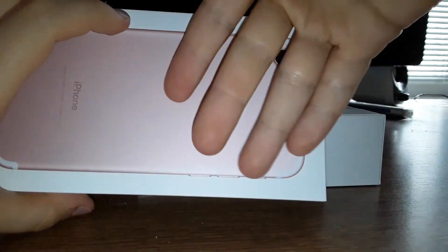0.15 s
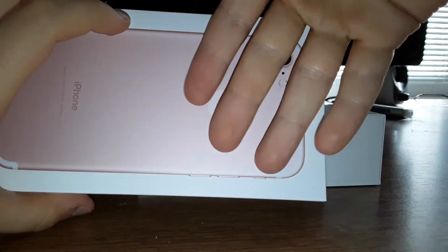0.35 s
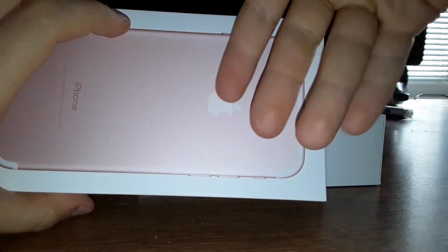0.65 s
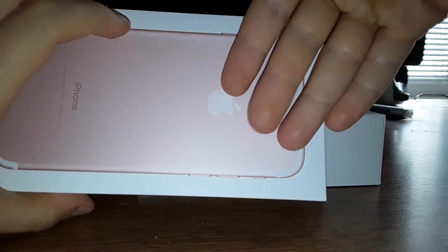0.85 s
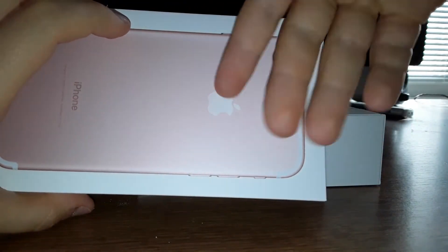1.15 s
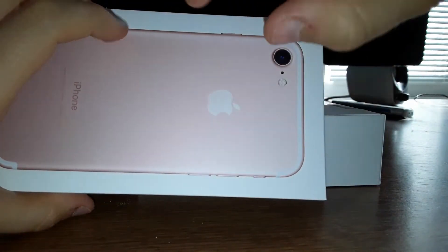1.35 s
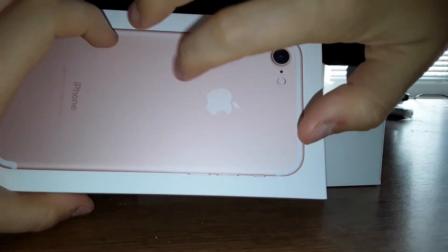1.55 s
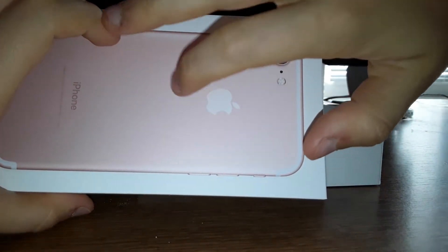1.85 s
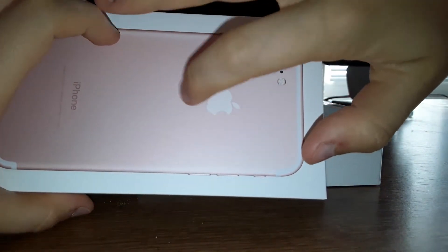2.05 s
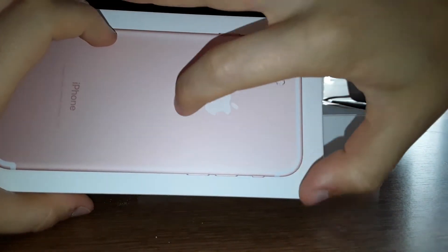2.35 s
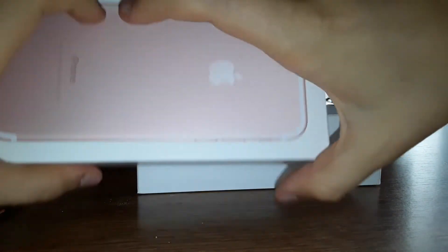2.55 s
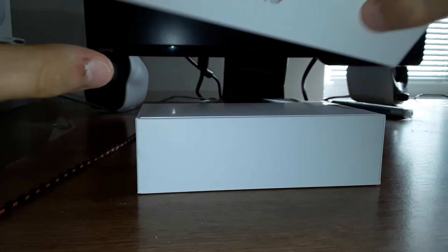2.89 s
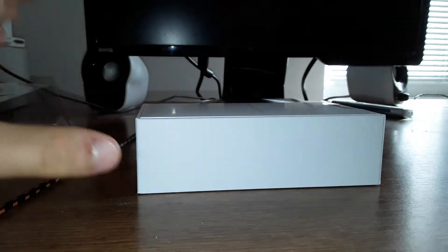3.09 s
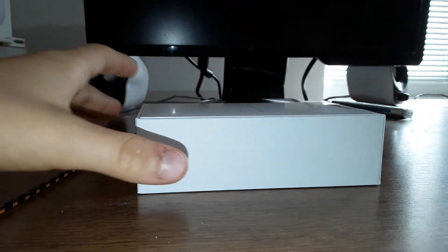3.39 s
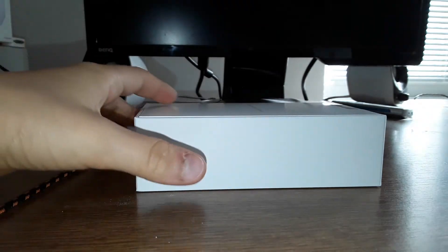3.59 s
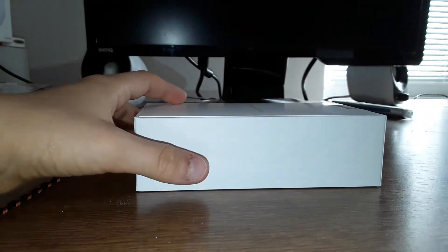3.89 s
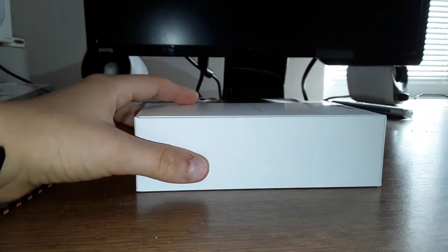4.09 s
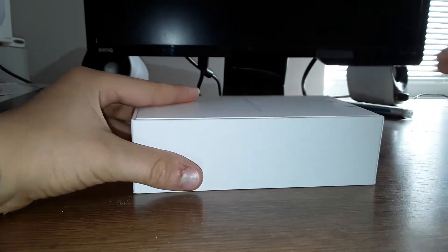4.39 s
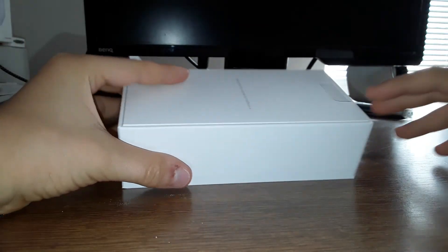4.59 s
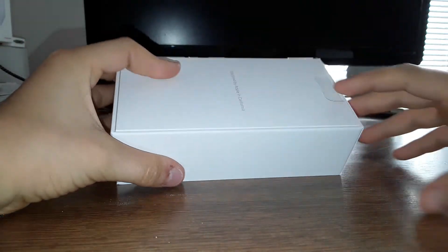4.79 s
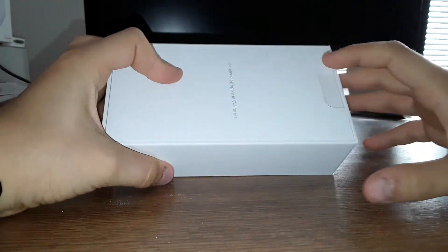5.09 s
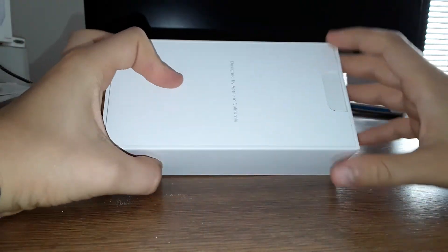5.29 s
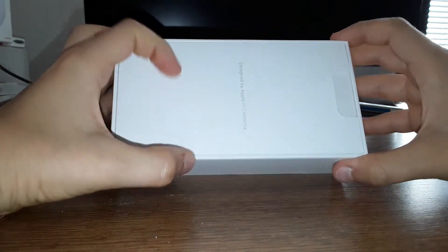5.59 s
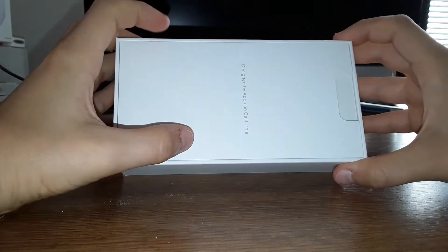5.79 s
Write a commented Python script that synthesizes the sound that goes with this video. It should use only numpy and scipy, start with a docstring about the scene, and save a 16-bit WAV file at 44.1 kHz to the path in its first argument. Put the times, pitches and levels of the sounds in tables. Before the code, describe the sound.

Close to a small microphone in a quiet, faintly humming room, fingertips drum irregularly on a hollow cardboard lid, then tap in a steady run. The lid is moved away with a soft bright rustle. A heavier box is gripped, knocked loudly on a wooden desk, then scraped and turned, with one sharp thump and two tiny squeaks.

```python
"""Fingers drum on the hollow lid of a small cardboard box: each blow excites damped modes of the card.
Then the lid is put aside, and the heavy base is gripped, tipped, knocked and slid on a wooden desk.
Knocks are modal too; rubbing is random grains of friction, squeaks are nearly periodic stick-slip,
snaps are short noise bursts. Behind them lie filtered air noise, hum, a rumble and a fading motor."""
import sys
import numpy as np
from scipy import signal
from scipy.io import wavfile
from scipy.ndimage import uniform_filter1d

SR = 44100
rng = np.random.default_rng(int(sys.argv[2]) if len(sys.argv) > 2 else 0)


def store_pcm(level_fs):
    """Save levels as 16-bit WAV."""
    pcm = np.round(np.clip(level_fs, -1, 1) * 32767).astype(np.int16)
    wavfile.write(sys.argv[1], SR, np.atleast_2d(pcm).T)


N = 261954  # length [samples]

# steady air of the room: (frequency [Hz], relative level [dB per Hz])
AIR_SPECTRUM = [(20, -5.5), (40, -21), (107, -3.5), (200, -4.5), (250, -12.5), (300, -17.5), (500, -14),
                (855, -28), (2040, -33.5), (4600, -44), (6250, -50), (8100, -27.5), (10000, -34),
                (11300, -38), (12200, -38.5), (13200, -37.5), (14500, -49), (16200, -61.5)]
# wavering room tones: (frequency [Hz], width [Hz], rms level [dB])
HUM_LINES = [(59, 4, -76), (123, 9.5, -59), (239.6, 1.7, -53.5), (544, 3.7, -69.5)]
# distant motor, droning and fading:
# (time [s], pitch [Hz], rms level of the fundamental [dB], rms level of the third multiple [dB])
MOTOR_COURSE = [(0, 68.6, -50, -55), (.3, 67.3, -49, -57.5), (.6, 66.25, -51, -43), (.75, 65.3, -46, -46.5),
                (.85, 65, -49, -53), (.95, 60.5, -57, -55), (1.8, 60.7, -83, -81)]
# decay of the room: (frequency [Hz], 60 dB decay time [s])
ROOM_DECAY = [(100, 0.1), (300, 0.28), (600, 0.34), (1500, 0.32), (4000, 0.18), (9000, 0.21)]

# bright hiss of skin on card, through a peaky microphone: (frequency [Hz], relative level [dB])
SKIN_SPECTRUM = [(3500, -23), (5000, -15.5), (6600, -6.5), (7800, 7), (8400, 6.5), (9600, -6), (11000, -21),
                 (12300, -15.5), (14000, -34.5), (16000, -61)]
# dull swish of hands on card: (frequency [Hz], relative level [dB])
SWISH_SPECTRUM = [(900, -32), (1600, -3), (2200, 1), (2700, -3.5), (3800, -5), (4600, -9.5), (6000, -4.5),
                  (8000, -10), (12000, -61.5)]
# scrape of the box on wood: (frequency [Hz], relative level [dB])
SCRAPE_SPECTRUM = [(500, -12), (700, 0), (880, -0.5), (980, 3.5), (1150, -2.5), (1400, -3.5), (1650, -2),
                   (2200, -17), (3500, -29), (6000, -32), (12000, -90.5)]
# low grind of the box on wood: (frequency [Hz], relative level [dB])
GRIND_SPECTRUM = [(90, -31.5), (140, 5.5), (220, 4.5), (320, 1.5), (450, 1.5), (620, -5.5), (900, -36),
                  (3000, -84.5)]
# the box shifts and drags: (time [s], scrape level [dB], low grind level [dB])
DRAG_COURSE = [(0, -63.5, -50), (.7, -64, -57), (1.3, -69, -56.5), (2.1, -73, -55.5), (2.4, -60.5, -47.5),
               (2.53, -51, -45.5), (2.68, -57.5, -48.5), (2.84, -67.5, -58), (3.5, -68.5, -52.5),
               (3.8, -54.5, -57.5), (3.87, -45.5, -40), (4.0, -59.5, -45), (4.28, -63, -55),
               (4.45, -55.5, -48), (4.61, -45, -42), (4.8, -53, -49.5), (4.93, -50.5, -49.5),
               (5.06, -64, -53.5), (5.23, -54.5, -57), (5.38, -53, -36.5), (5.47, -49.5, -50.5),
               (5.59, -47, -39), (5.69, -63, -54.5), (5.94, -77, -60)]
# hands stroke the card: (time of maximum [s], swell [s], fade [s], hiss level [dB], swish level [dB])
HAND_STROKES = [(.57, 0.12, 0.13, -58.5, -65), (1.29, 0.13, 0.11, -54.5, -67.5),
                (1.5, .03, 0.025, -52, -78), (1.64, .01, .12, -55, -75), (2.37, .03, 0.13, -62, -65.5),
                (2.5, 0.015, 0.073, -57, -55), (2.578, 0.015, 0.11, -52, -47),
                (2.74, 0.12, 0.26, -56.5, -61.5), (3.25, 0.19, 0.39, -54, -60),
                (3.54, 0.054, 0.046, -55, -57), (3.84, 0.19, 0.16, -47, -53), (4.13, 0.083, 0.11, -53, -54),
                (4.24, 0.05, 0.23, -56, -61.5), (4.51, 0.14, 0.28, -55.5, -56.5),
                (4.67, 0.031, 0.048, -56, -63), (4.92, .1, 0.1, -60, -63.5), (5.12, 0.1, .07, -55.5, -66),
                (5.22, 0.055, .08, -52.5, -62.5), (5.33, 0.12, 0.3, -70, -61.5),
                (5.58, 0.21, 0.11, -50.5, -54.5), (5.68, 0.11, 0.018, -52, -65)]
# faint narrow whistles while the lid is put aside:
# (time [s], length [s], frequency [Hz], level [dB])
WHISTLE_EVENTS = [(3.103, .1, 2380, -64), (3.182, 0.069, 2050, -64), (3.298, .15, 2400, -70)]

# the edge of the base squeaks on the desk, one list per squeak:
# (time [s], level [dB], mean slip rate [1/s])
SQUEAK_COURSES = [
    [(5.285, -50, 410), (5.3, -38, 370), (5.312, -27.5, 374), (5.322, -23.5, 340), (5.332, -30, 330)],
    [(5.545, -40, 270), (5.56, -31.5, 350), (5.575, -27.5, 299), (5.595, -45, 260)],
]
# harmonics of each squeak: (multiple of the slip rate, relative level [dB])
SQUEAK_HARMONICS = [
    [(1, -14), (2, 0), (3, -7), (4, -17), (5, -20), (6, -30)],
    [(1, 0), (2, -24), (3, -18), (4, -30), (5, -32), (6, -36)],
]
# skin letting go of the card with a snap: (time [s], level [dB], length [ms])
SNAP_EVENTS = [(0.355, -45, 2.4), (1.143, -50, 17), (1.474, -44, 20), (1.495, -42.5, 8.4), (1.549, -58, 17),
               (1.947, -48, 6.1), (2.084, -47, 3.6), (2.218, -47.5, 7), (2.367, -43.5, 16),
               (2.503, -44, 2.5), (2.52, -43, 3.7), (2.542, -49, 2.3), (2.6, -53, 4), (2.683, -50, 2),
               (2.71, -47, 3.2), (2.737, -49, 4.4), (3.506, -45, 5), (3.524, -34, 4.5), (3.543, -30, 1.7),
               (3.56, -40, 2.2), (4.078, -52, 3), (4.115, -40, 1.8), (4.132, -32, 1.1), (4.217, -33, 1.9),
               (4.623, -42, 2.4), (4.662, -46, 3), (4.677, -43.5, 2.7), (4.842, -52, 7.3), (4.911, -48, 16),
               (5.214, -49, 23), (5.676, -54, 13)]
# burst as the skin lets go: (frequency [Hz], relative level [dB])
SNAP_SPECTRUM = [(1500, -48.5), (2500, -13.5), (4500, -16), (6600, -3.5), (8100, 9), (9600, -8.5),
                 (12000, -21.5), (14000, -31), (16000, -46)]
# cracking card fibres: (frequency [Hz], relative level [dB])
CRACK_SPECTRUM = [(700, -23), (1500, 4), (2800, -10.5), (4500, -3), (6000, -6), (8100, -6.5), (11000, -33)]
# contact tick of a blow: (frequency [Hz], relative level [dB])
TICK_SPECTRUM = [(1000, -32), (2000, -24.5), (3500, -10), (5000, -12.5), (6600, -4.5), (8100, 11.5),
                 (9600, -3.5), (12000, -15.5), (14500, -28), (16000, -36)]

# knocks of the base on the desk: (time [s], desk boom level [dB], body level [dB], thud level [dB],
# low wall level [dB], corner slap level [dB])
KNOCK_EVENTS = [(3.651, -33, -26, -46, -21, -50), (3.735, -55, -13, -50, -20, -44),
                (3.822, -29, 2.5, -55, -19.5, -17.5), (3.849, -55, -10.5, -28, -16, -28),
                (3.888, -33, -32, -37, -38, -48), (3.93, -44, -35, -47, -33, -40),
                (4.494, -30.5, -36, -31, -30.5, -42), (4.526, -48, -32.5, -26.5, -26, -38),
                (4.548, -47, -37.5, -50, -23.5, -41), (4.585, -32, -37, -33, -30.5, -52),
                (4.863, -40, -44, -31, -37, -34.5), (4.894, -36.5, -33, -32, -35.5, -36),
                (5.332, -14, -21, -22.5, -9.5, -6.5), (5.34, -55, -14, -25, -36.5, -52),
                (5.58, -30.5, -45, -28, -35, -33)]
# modes of the base, in groups body, thud, low wall, corner slap:
# (nominal frequency [Hz], nominal relative level [dB], 60 dB decay time [s])
BASE_MODES = [
    [(593, -7.5, 0.11), (576, -11, 0.072), (519, 9, 0.043), (461.7, 10.5, 0.032), (393, -13.5, 0.34),
     (572, -20, 0.087), (542, -29, 0.95)],
    [(102.6, 11, 0.022), (141, -9.5, 0.052), (217, -6.5, 0.088)],
    [(305, 11.5, 0.047), (232, -0.5, 0.026), (384.3, 1.5, 0.058)],
    [(1042, 5, 0.034), (877, -9.5, 0.076), (1360, -13, 0.089), (1652, -6, 0.029), (1800, -11.5, 0.03),
     (2885, -26.5, 0.023)],
]
# finger taps on the lid: (time [s], desk boom level [dB], nail tick level [dB], hollow ring level [dB],
# pad thud level [dB], card slap level [dB], rebound level [dB])
TAP_EVENTS = [(.002, -50, -21, -42, -38, -30.5, -49), (.02, -50, -31, -13, -44, -38, -51),
              (.191, -33.5, -23.5, -12.5, -28, -24.5, -43), (.232, -41, -40, -17.5, -33, -42, -57),
              (0.365, -57, -54.5, -31, -35, -38, -41), (.387, -55, -31.5, -19, -39, -29.5, -52),
              (0.451, -52, -31, -31, -37, -33, -41), (.523, -44, -27.5, -10, -54, -21.5, -45),
              (.701, -61, -21.5, -20, -29.5, -25.5, -45), (.738, -56, -23, -31.5, -26, -27, -37),
              (.811, -41, -26.5, -12.5, -31, -22, -49), (.995, -56, -26, -34, -26, -30.5, -34),
              (1.017, -35, -14.5, -14.5, -23, -19, -36), (1.141, -63, -44, -15, -35, -33, -39.5),
              (1.433, -29.5, -28, -25.5, -17.5, -34.5, -30.5), (1.618, -26, -23.5, -16, -15, -30, -21),
              (1.78, -35, -26, -15.5, -15, -29, -18.5), (1.919, -34, -33, -17, -16, -27.5, -19),
              (2.044, -33.5, -28.5, -17.5, -17, -31, -20), (2.172, -32.5, -29, -17.5, -14.5, -29, -24),
              (2.3, -39, -35, -18.5, -15, -31.5, -24), (2.484, -24.5, -40, -10, -14, -22, -29),
              (2.503, -33.5, -45, -24, -19, -29.5, -28), (2.573, -71, -20, -38, -53, -29, -49),
              (2.683, -65, -50, -38.5, -61, -42, -55)]
# modes of the lid, in groups ring, thud, flex, slap:
# (nominal frequency [Hz], nominal relative level [dB], 60 dB decay time [s])
LID_MODES = [
    [(645.3, -1.5, 0.023), (495, -23, 0.029), (748, -18, 0.01), (834, -13, 0.019)],
    [(149, 8, 0.03), (81, -31, 0.027), (193, -2.5, 0.033)],
    [(306, 8.5, 0.05), (377.3, -9.5, 0.088)],
    [(964, 7, 0.024), (1190, 17.5, 0.015), (1380, 4.5, 0.018), (1717, 4, 0.034), (2470, 2, 0.013),
     (4410, -6, 0.016)],
]
# parts of the lid's rebound against its level: (tick, ring, thud, flex, slap) [dB]
REBOUND_PARTS = (-30, -17, -18, 0, -18)

AIR_DB, RUMBLE_DB = -53.5, -57  # rms levels [dB]
HUM_WAVER = 0.57  # amplitude share of the wavering part of each hum line, before levelling
EARLY_S, EARLY_DB = 0.034, 1.5  # reverberation taps before this time [s] are stronger by this [dB]
DESK_HZ, DESK_T60_S, DESK_LAG_S = 134, .5, .027  # the desk top booms late
SHAKE_DB = -0.5  # desk shake against the grind [dB]
STROKE_DROP_DB = 12  # drop over one swell or fade time [dB]
HOLD_DB = (-78, -77.5)  # hiss and swish of the holding hand [dB]
WIPE_DB = (-35, -40.5)  # sliding finger: hiss against the tick, swish against the slap [dB]
WIPE_FALL_DB_PER_S = 110
WHISTLE_WIDTH_HZ = 37
CRISP_MS = 3  # snaps up to this length crack the fibres fully, longer ones less
KNOCK_TICK_DB, TAP_FLEX_DB = -35, -5.5  # knock tick and lid flex against the slap [dB]
REBOUND_S = .011  # the dented lid springs back after this time [s]
CONTACT_LAG_S = 0.001028  # the modes start this long after the tick [s]
EDGE_HZ = 16400  # upper band limit


def amp(db):
    """Decibel law: a level as an amplitude ratio."""
    return 10 ** (np.asarray(db, float) / 20)


def evened(x):
    """Normalisation of power: the signal at rms 1."""
    return x / np.sqrt(np.mean(x ** 2) + 1e-20)


def read(points, hz):
    """Interpolation along a logarithmic frequency axis."""
    f, value = np.transpose(points)
    return np.interp(np.log(hz + 1), np.log(f + 1), value)


def curves(rows):
    """Linear interpolation in time of every column after the first."""
    s, *columns = np.transpose(rows)
    return [np.interp(np.arange(N) / SR, s, c) for c in columns]


def add(mix, s, sound):
    """Superposition: a sound added in place from time s, cut at the end of the mix."""
    part = mix[round(s * SR):][:len(sound)]
    part += sound[:len(part)]


def coloured(x, points):
    """Minimum-phase filtering: a causal response of unit energy with the given spectrum."""
    level = np.maximum(read(points, abs(np.fft.fftfreq(8192, 1 / SR))), -100)
    log_gain = np.log(amp(level))
    # the Hilbert transform of the log gain supplies the minimum phase
    taps = np.fft.ifft(np.exp(np.conj(signal.hilbert(log_gain)))).real[:4096]
    return signal.oaconvolve(x, taps / np.linalg.norm(taps))[:len(x)]


def band(x, hz, width):
    """Resonance: a one-pole low-pass, shifted in frequency, of gain 1 at its centre."""
    turn = np.exp(2j * np.pi * hz * np.arange(len(x)) / SR)
    r = np.exp(-np.pi * width / SR)
    return 2 * (turn * signal.lfilter([1 - r], [1, -r], x / turn)).real


def grains(per_s, spread_db):
    """Random impulse process: clicks of very uneven size and random sign, rms 1."""
    size = amp(spread_db * np.minimum(rng.exponential(1, N), 5)) * rng.choice([-1., 1.], N)
    return evened(size * (rng.random(N) < per_s / SR))


def air():
    """Broadband noise: steady random pressure with the spectrum of the room."""
    return amp(AIR_DB) * coloured(rng.standard_normal(N), AIR_SPECTRUM)


def hum():
    """Partial coherence: each line mixes a pure tone with narrow-band noise, so it wavers."""
    out = np.zeros(N)
    t = np.arange(N) / SR
    for hz, width, db in HUM_LINES:
        wavering = evened(band(rng.standard_normal(N), hz, width))
        steady = np.sin(2 * np.pi * hz * t)
        out += amp(db) * evened(HUM_WAVER * wavering + (1 - HUM_WAVER) * steady)
    return out


def rumble():
    """Cascaded resonance: noise through two equal low resonances."""
    once = band(rng.standard_normal(N), 62, 33)
    return amp(RUMBLE_DB) * evened(band(once, 62, 33))


def motor():
    """Harmonic rotation: a gliding fundamental and its third multiple share one phase."""
    hz, first_db, third_db = curves(MOTOR_COURSE)
    turn = 2 * np.pi * np.cumsum(hz) / SR
    tone = amp(first_db) * np.sin(turn) + amp(third_db) * np.sin(turn * 3)
    return np.sqrt(2) * tone  # a sine of rms 1 has peak sqrt(2)


def room_tone():
    """Superposition of the background sources: air, hum, rumble and motor."""
    return air() + hum() + rumble() + motor()


def reverb(x):
    """Diffuse decay: sparse taps of random sign, each frequency band dying at its own rate."""
    taps = np.zeros(SR // 2)
    at = np.arange(300, SR // 2 - 20, 20)
    early = amp(EARLY_DB * (at < EARLY_S * SR))
    taps[at + rng.integers(0, 20, len(at))] = early * rng.choice([-1., 1.], len(at))
    hz, t, z = signal.stft(taps, SR, nperseg=512)
    decay = amp(-60 * t / read(ROOM_DECAY, hz)[:, None])
    tail = signal.istft(z * decay, SR, nperseg=512)[1]
    return signal.oaconvolve(x, tail / np.linalg.norm(tail))[:N]


def contact():
    """Addition of powers: gains of hiss and swish from holding hand, strokes and slides after taps."""
    t = np.arange(0, N, 64) / SR
    power = amp(HOLD_DB)[:, None] ** 2 * np.ones(len(t))
    for s, swell, fade, *db in HAND_STROKES:
        away = np.where(t < s, (s - t) / swell, (t - s) / fade)
        power = power + amp(np.subtract.outer(db, STROKE_DROP_DB * away)) ** 2
    for s, _, tick_db, _, _, slap_db, _ in TAP_EVENTS:
        start_db = np.add((tick_db, slap_db), WIPE_DB)
        slide = amp(np.subtract.outer(start_db, WIPE_FALL_DB_PER_S * abs(t - s)))
        power = power + (t >= s) * slide ** 2
    return [np.interp(np.arange(N) / SR, t, np.sqrt(p)) for p in power]


def rubbing():
    """Granular friction: dense grains of skin on card, sparser slips on wood that also shake the desk."""
    hiss_gain, swish_gain = contact()
    scrape_db, grind_db = curves(DRAG_COURSE)
    hiss = coloured(hiss_gain * grains(6000, 1.8), SKIN_SPECTRUM)
    swish = coloured(swish_gain * grains(2000, 2.5), SWISH_SPECTRUM)
    scrape = coloured(amp(scrape_db) * grains(1500, 1.7), SCRAPE_SPECTRUM)
    slips = grains(900, 0.78)
    grind = coloured(amp(grind_db) * slips, GRIND_SPECTRUM)
    shake = amp(grind_db + SHAKE_DB) * evened(band(slips, DESK_HZ, 14.0))
    return hiss + swish + scrape + grind + shake


def whistles():
    """Narrow-band noise: one resonance of random input, swelling and fading."""
    out = np.zeros(N)
    for s, length, hz, db in WHISTLE_EVENTS:
        n = round(length * SR)
        tone = evened(band(rng.standard_normal(SR // 2), hz, WHISTLE_WIDTH_HZ))
        add(out, s, amp(db) * np.hanning(n) * tone[-n:])  # the end, where the resonance has built up
    return out


def squeaks():
    """Stick-slip oscillation: harmonics of a slightly irregular, changing slip rate."""
    out = np.zeros(N)
    for rows, harmonics in zip(SQUEAK_COURSES, SQUEAK_HARMONICS):
        s, db, per_s = np.transpose(rows)
        t = np.arange(s[0], s[-1], 1 / SR)
        jitter = 1 + .15 * uniform_filter1d(rng.standard_normal(len(t)), 120)
        turns = np.cumsum(np.interp(t, s, per_s) * jitter) / SR
        stack = sum(amp(k_db) * np.sin(2 * np.pi * round(k) * turns) for k, k_db in harmonics)
        level = amp(np.interp(t, s, db))
        add(out, s[0], level * evened(stack) * signal.windows.tukey(len(t), .1))
    return out


def snaps():
    """Sudden release: bright noise bursts that start quickly and last as long as the skin slips."""
    out, cracks = np.zeros(N), np.zeros(N)
    ms_axis = np.arange(3000) / SR * 1000
    for s, db, ms in SNAP_EVENTS:
        envelope = np.minimum(ms_axis / (0.32 * ms), 1) * np.exp(-(ms_axis / ms) ** 2)
        burst = amp(db) * rng.standard_normal(3000) * envelope
        add(out, s, burst)
        add(cracks, s, burst * min(CRISP_MS / ms, 1))
    return coloured(out, SNAP_SPECTRUM) + amp(-7) * coloured(cracks, CRACK_SPECTRUM)


def boom():
    """Delayed modal response: the slow mode of the desk sets in a few cycles late and rings on."""
    t = np.arange(SR // 2) / SR
    onset = 1 - np.exp(-(t / DESK_LAG_S) ** 3)
    return amp(-60 * t / DESK_T60_S) * onset * np.sin(2 * np.pi * DESK_HZ * t)


def mode_group(modes, rise_turns, t):
    """Modal superposition: damped sines, each slightly varied in pitch and level, scaled to peak 1."""
    ring = np.zeros(len(t))
    for (hz, mode_db, t60), (a, b) in zip(modes, rng.standard_normal((len(modes), 2))):
        soft = 1 - np.exp(-(t * hz / rise_turns) ** 2)  # the contact takes part of a cycle
        level = amp(mode_db + 0.9 * a - 60 * t / t60)
        ring += level * soft * np.sin(2 * np.pi * hz * (1 + 0.026 * b) * t)
    return ring / abs(ring).max()


def blows(events, groups, rise_turns, tick_ms, crack_db):
    """Impact excitation: each blow ticks, cracks, rings every group of modes and booms the desk."""
    out, ticks, cracks = np.zeros(N), np.zeros(N), np.zeros(N)
    t = np.arange(SR // 4) / SR
    desk = boom()
    for s, boom_db, tick_db, *group_db in events:
        # the thud pushes out, the card dents in
        for db, modes, sign in zip(group_db, groups, (-1, 1, -1, -1)):
            add(out, s + CONTACT_LAG_S, sign * amp(db) * mode_group(modes, rise_turns, t))
        add(out, s, amp(boom_db) * desk)
        burst = rng.standard_normal((2, 400)) * np.exp(-t[:400] * 1000 / tick_ms)
        add(ticks, s, amp(tick_db) * burst[0])
        add(cracks, s, amp(group_db[-1] + crack_db) * burst[1])  # fibres crack with the slap
    return out + coloured(ticks, TICK_SPECTRUM) + coloured(cracks, CRACK_SPECTRUM)


def base_knocks():
    """Impact of a heavy body: the contact tick follows the slap in level."""
    events = [(s, boom_db, rest[-1] + KNOCK_TICK_DB, *rest) for s, boom_db, *rest in KNOCK_EVENTS]
    return blows(events, BASE_MODES, rise_turns=0.91, tick_ms=0.43, crack_db=-28.5)


def lid_taps():
    """Elastic rebound: every tap dents the lid, which springs back as a second blow without boom."""
    events = []
    for s, boom_db, tick, ring, thud, slap, _ in TAP_EVENTS:
        events.append((s, boom_db, tick, ring, thud, slap + TAP_FLEX_DB, slap))
    for s, *_, back in TAP_EVENTS:
        events.append((s + REBOUND_S, -np.inf, *(back + np.array(REBOUND_PARTS))))
    return blows(events, LID_MODES, rise_turns=0.55, tick_ms=1.0, crack_db=-15)


def scene():
    """Direct and diffuse sound: the lid is held in the air, the base on the desk sounds wetter."""
    lid = lid_taps() + snaps()
    base = base_knocks() + squeaks()
    wet = reverb(amp(-17) * lid + amp(-11) * base)
    return (lid + base + wet + rubbing() + whistles() + room_tone())[None]


def record(dry):
    """Transducer limits: a small microphone loses the deepest bass, clips at full scale, cuts the top."""
    thin = signal.sosfilt(signal.butter(2, 55, "high", fs=SR, output="sos"), dry)
    clipped = np.clip(thin, -1, 1)
    low_pass = signal.firwin(511, EDGE_HZ, window=("kaiser", 9), fs=SR)
    return signal.oaconvolve(clipped, low_pass[None], "same")


dry = scene()
out = record(dry)
store_pcm(out)
```